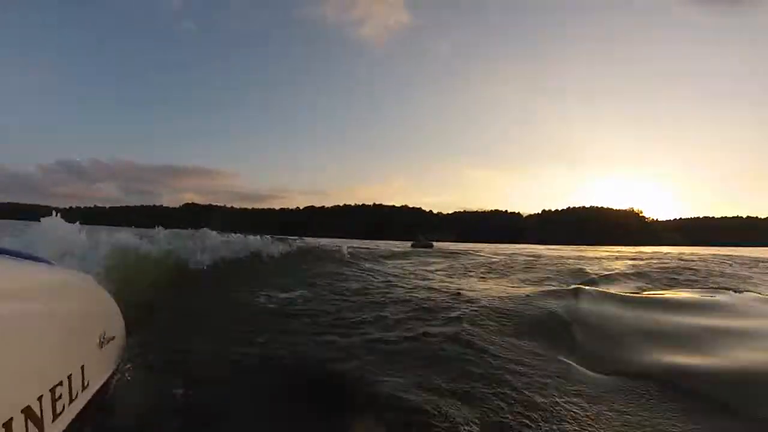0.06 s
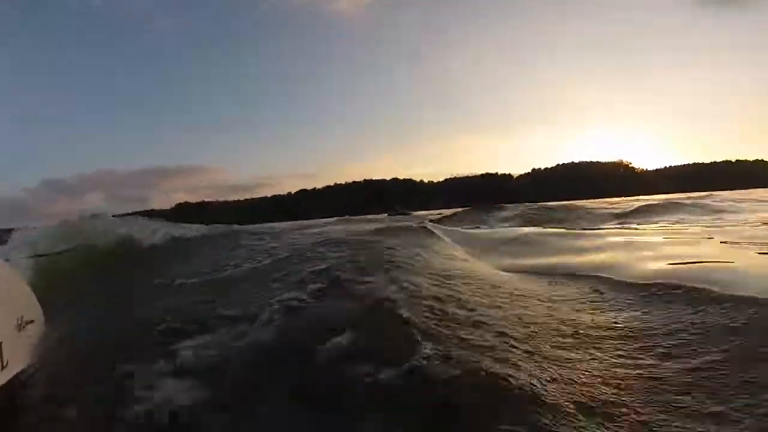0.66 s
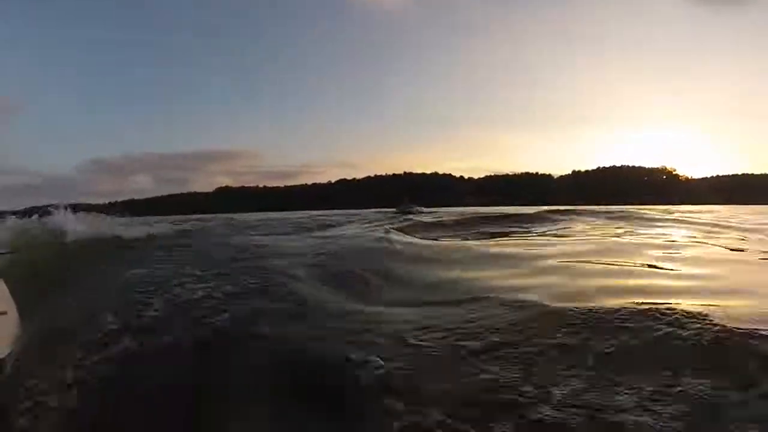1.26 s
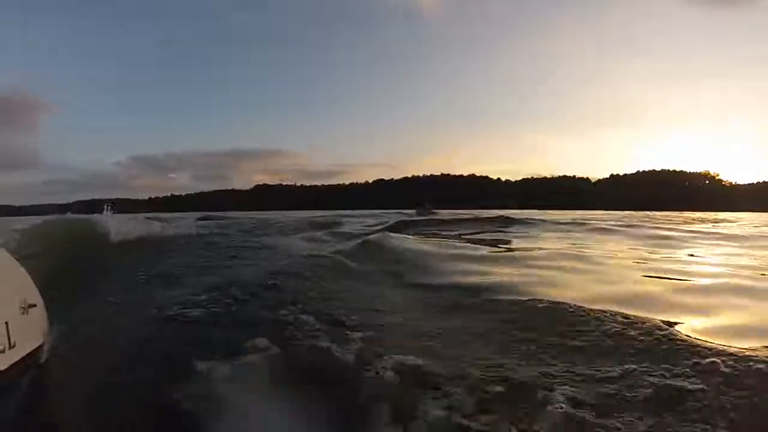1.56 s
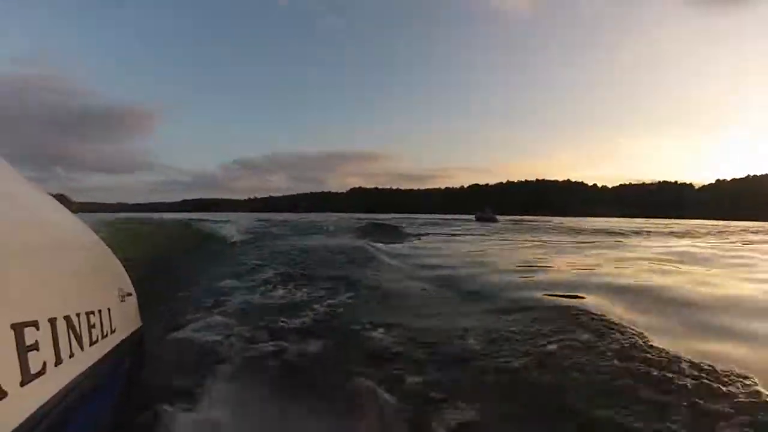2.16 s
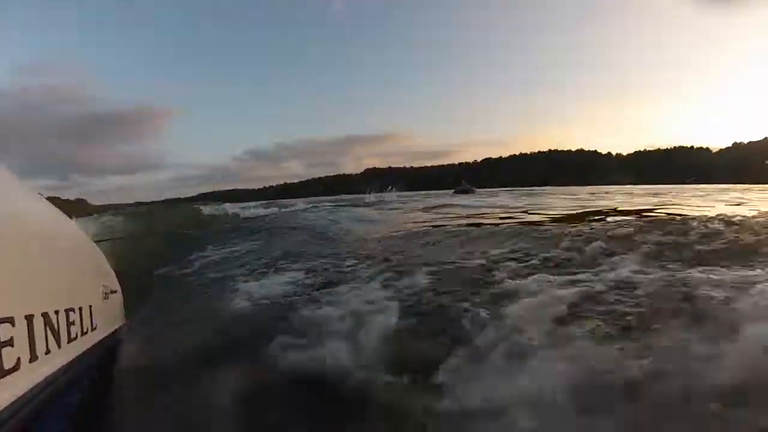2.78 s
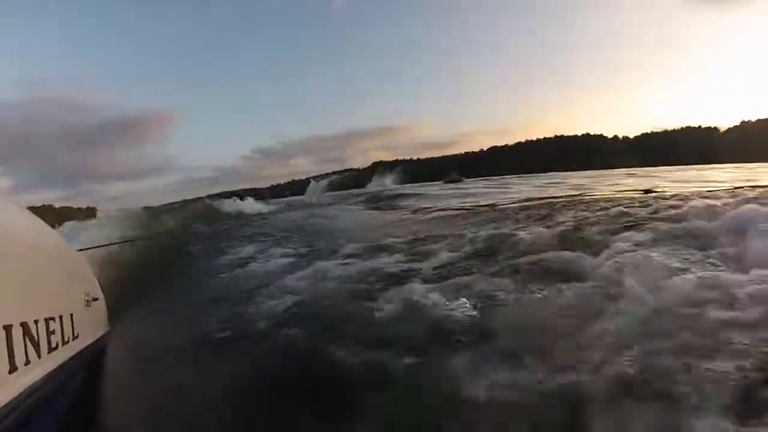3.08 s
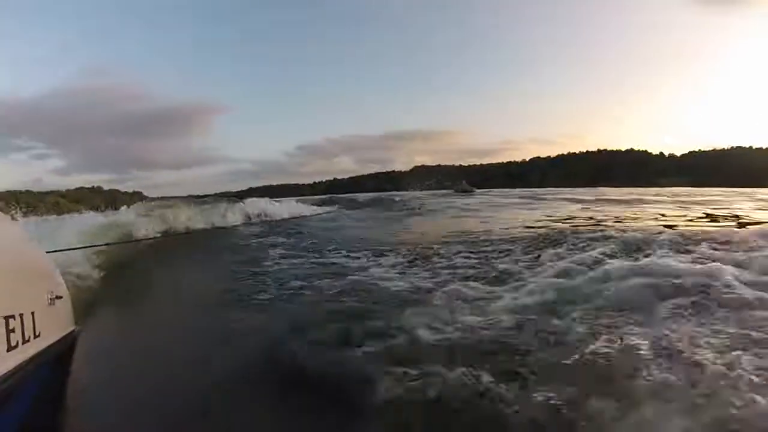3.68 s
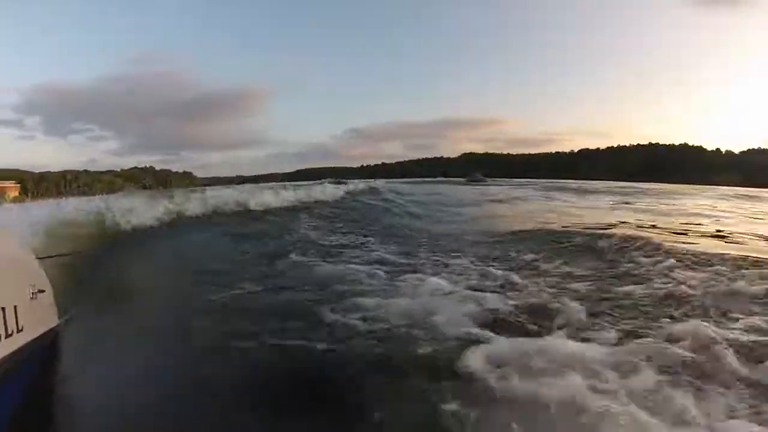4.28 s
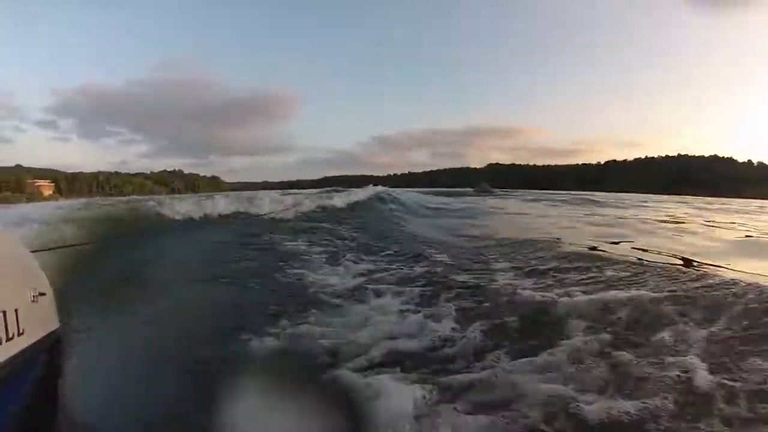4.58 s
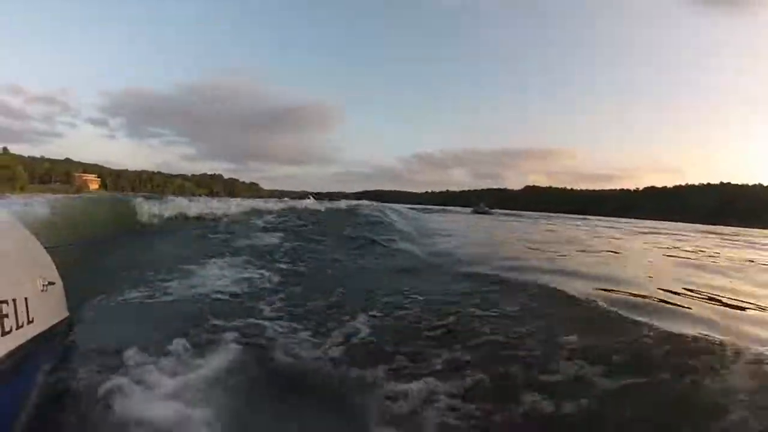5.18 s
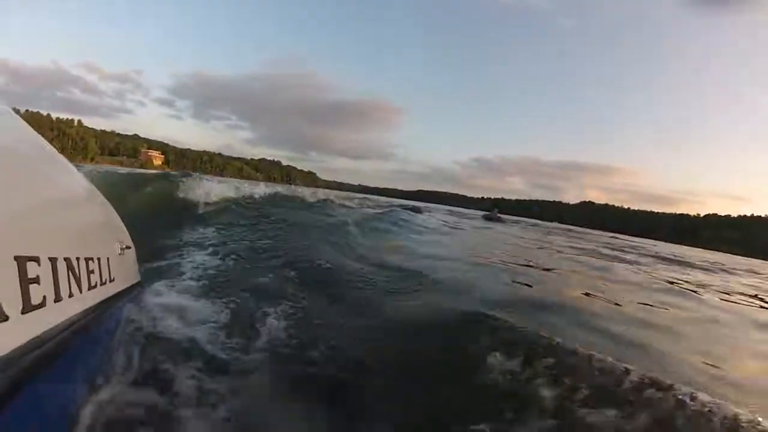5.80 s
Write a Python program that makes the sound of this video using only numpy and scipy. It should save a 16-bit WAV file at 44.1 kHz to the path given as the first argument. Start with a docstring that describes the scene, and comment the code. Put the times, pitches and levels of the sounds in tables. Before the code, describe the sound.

A motorboat cruises over a lake at a steady speed, heard from low beside the stern. Its exhaust throbs unevenly under rushing, gurgling water, and drops slap close to the microphone. After about two seconds the engine grows into a louder hum with a deep hull rumble, while waves break into hissing spray and more drops slap. Near the end the exhaust throbs again.

```python
"""A six-cylinder motorboat cruises over a lake, heard from a camera held low beside the stern.
At first the exhaust throbs as waves cover and uncover it; water rushes by and drops slap close up.
After two seconds the engine shakes the hull harder, and the exhaust settles into a louder hum.
Waves break into spray and more drops slap, all coloured by the ringing of the camera's case.
In the last second the exhaust throbs again."""
import sys
import numpy as np
from scipy import signal
from scipy.fft import rfft, irfft
from scipy.io import wavfile
from scipy.ndimage import uniform_filter1d

SR = 44100
rng = np.random.default_rng(int(sys.argv[2]) if len(sys.argv) > 2 else 0)


def generate_wav(sig):
    """Save sig (samples, or channels by samples) to the path in sys.argv[1] as 16-bit PCM at SR."""
    pcm = np.round(np.clip(np.atleast_2d(sig).T, -1, 1) * 32767).astype(np.int16)
    wavfile.write(sys.argv[1], SR, pcm)


N = 261954

# pitches that the camera's case boosts or dulls: pitch_hz, width_hz, gain_db
CASE_RINGING = [(1800, 100, -3), (2164, 280, 7.5), (2428, 170, -6), (2570, 140, 4), (3630, 190, -5.5),
                (4054, 130, 2.5), (5260, 270, -2.5), (5430, 1400, 5), (7090, 330, 3.5), (8450, 270, -0.5)]


def exhaust(turns):
    """Cylinders fire three times a turn; being unequal, they also drone, chug and growl. Gas burbles out."""
    # the hum between throbs: time_s, firing_db, octave_db, drone_db, growl_db
    hum_levels = [(0, -56, -59, -59, -65.5), (.7, -47, -59, -56.5, -65.5), (2.22, -46.5, -56.5, -58, -71),
                  (2.35, -42, -54, -51, -59), (2.5, -33, -48, -52.5, -56), (2.9, -37.5, -42, -48.5, -61),
                  (3.3, -36.5, -50, -54.5, -63.5), (3.75, -34.5, -53, -56, -61),
                  (4.2, -35.5, -58, -48, -65), (4.75, -34.5, -50.5, -50, -66.5),
                  (4.98, -39.5, -57.5, -54, -77), (5.94, -40.5, -63, -51, -62)]
    # a wave uncovers the outlet: middle_s, length_s, firing_db, octave_db
    throbs = [(.01, 0.041, -48, -43), (.13, .09, -40.5, -42), (.36, 0.062, -40, -39),
              (.56, 0.039, -37.5, -47), (.88, 0.1, -37, -56), (1.13, 0.064, -35, -50.5),
              (1.36, 0.098, -40.5, -57), (1.6, 0.13, -34.5, -46.5), (1.78, 0.081, -34, -51),
              (1.98, 0.056, -39.5, -45), (2.11, 0.082, -34.5, -49), (2.36, 0.07, -34, -48.5),
              (2.48, 0.056, -41, -55), (3.09, 0.083, -41, -34), (3.22, 0.066, -40, -39),
              (3.74, 0.13, -44.5, -49), (4.87, .06, -40.5, -54.5), (5.06, 0.093, -39.5, -47.5),
              (5.26, 0.11, -37.5, -47), (5.43, 0.096, -41, -49), (5.59, 0.084, -37.5, -59),
              (5.82, 0.067, -38, -51.5)]
    # low tones of the unequal cylinders: beats_per_cycle, relative_db
    chug_tones = [(7, -27), (10, -1.5), (11, -0.5), (13, 0), (14, 0.5), (15, -2)]
    # their higher tones: beats_per_cycle, relative_db
    growl_tones = [(16, -2), (18, -3), (19, -0.5), (20, -11), (24, 0), (30, -7.5), (34, -14), (42, -11.5)]
    # gas bubbling through water: pitch_hz, relative_db
    burble_shape = [(20, -20), (60, -1.5), (95, 2), (135, 6.5), (190, -15.5), (255, -2), (320, -22),
                    (420, -18), (700, -35)]
    steady_db, steady_octave_db, drone_db, growl_db = curves(hum_levels)
    throb, throb_octave = swells(throbs)
    firing_gain = undb(steady_db) + throb
    octave_gain = undb(steady_octave_db) + throb_octave
    firings, cycles = 3 * turns, turns / 2  # one engine cycle takes two turns
    hum = firing_gain * tone(firings, 1, rough=0.16) + octave_gain * tone(firings, 2, rough=0.28)
    # each row of cylinders makes half the firings and drones at three times that rate
    drone = undb(drone_db) * tone(firings / 2, 3, rough=0.39)
    chug = sum(undb(db) * tone(cycles, beats, rough=0.45) for beats, db in chug_tones)
    growl = sum(undb(db) * tone(cycles, beats, rough=0.45) for beats, db in growl_tones)
    burble = unit(colour(rng.standard_normal(N), burble_shape))
    # chug and burble swell as the outlet clears the water, but less than the hum does
    clear_db = 10 * np.log10(firing_gain * octave_gain) + 45
    chug_gain = undb(-61.5 + 0.59 * clear_db)
    burble_gain = undb(-49 + 0.32 * clear_db)
    return hum + drone + undb(growl_db) * growl + chug_gain * chug + burble_gain * burble


def hull(turns):
    """The engine shakes the hull once and twice a turn, with a wobble at half and one and a half times a turn,
    and a low rumble."""
    # strength of the shaking: time_s, once_a_turn_db, twice_a_turn_db
    shake_levels = [(0, -48, -46), (.5, -56, -48.5), (1.75, -56, -56), (2.1, -40.5, -48), (2.6, -34, -38.5),
                    (2.9, -38.5, -35.5), (3.15, -34.5, -36.5), (3.45, -36.5, -30), (3.9, -36.5, -30),
                    (4.7, -33, -35.5), (5.25, -35, -44), (5.94, -35, -50)]
    once_gain, twice_gain = undb(curves(shake_levels))
    rumble_shape = [(12, 13), (24, 6), (45, -5), (63, 9.5), (80, -11.5)]  # pitch_hz, relative_db
    rumble = unit(colour(rng.standard_normal(N), rumble_shape))
    cycles = turns / 2
    wobble = undb(-15) * tone(cycles, 1, rough=0.55) + undb(-13) * tone(cycles, 3, rough=0.4)
    once = undb(0.83 * wander(9) + 0.5) * tone(turns, 1, rough=0.21)
    twice = tone(turns, 2, rough=0.05)
    rumble_gain = np.hypot(undb(-8.5) * once_gain, undb(-47.5))  # part follows the shaking, part is steady
    return once_gain * (once + wobble) + twice_gain * twice + rumble_gain * rumble


def slaps(burst_s=0.0019, fizz_s=0.0048):
    """Each slap is an air pocket collapsing inside a softer, higher fizz of droplets; both ring the case."""
    # water slapping close by: time_s, relative_db, pitch_hz, spread_octaves
    hits = [(.325, -41.5, 2900, 0.8), (.365, -40, 2000, 0.51), (.388, -38, 2960, 0.48),
            (.431, -40, 2100, .7), (.456, -47, 5100, 0.86), (0.5058, -36, 2270, 0.69),
            (.556, -33.5, 2060, .5), (.62, -44.5, 4000, .4), (.672, -32.5, 1860, 0.65),
            (.726, -39.5, 2600, .3), (0.76, -34.5, 1900, .5), (.794, -41, 5470, .45),
            (2.102, -42.5, 3500, 0.46), (2.205, -47, 6500, 0.18), (2.302, -42.5, 5630, 0.53),
            (2.326, -45, 3900, 0.76), (2.38, -32, 2500, 0.83), (2.502, -42, 5200, 0.77),
            (2.551, -39.5, 2840, 0.52), (2.649, -35.5, 2100, 0.55), (2.675, -37, 2200, 0.16),
            (2.965, -35, 3040, 0.26), (3.027, -37, 2400, .5), (3.266, -45, 3900, 1.1),
            (3.373, -36, 2530, 0.36), (3.396, -31, 2060, 0.37), (3.457, -35, 2650, 0.43),
            (3.498, -27, 2460, 0.28), (3.53, -39, 4150, .4), (3.601, -38, 3700, 0.16),
            (3.651, -40, 3900, .3), (4.069, -38, 2300, 0.54), (4.229, -36.5, 5200, .4),
            (4.252, -38.5, 5000, 0.5), (4.267, -38, 4200, 0.77), (4.327, -40, 4270, 0.33),
            (4.353, -39, 4440, .4)]
    # the two parts of a slap: pitch_hz, relative_db
    pocket_shape = [(600, -6.5), (1200, 1.5), (1550, 11.5), (1830, -5.5), (2200, 1.0), (3500, -2.5),
                    (5600, -4), (15000, -16.5)]
    fizz_shape = [(1000, 2), (5600, -6), (12000, -3)]
    out = np.zeros(N + SR)
    size = 2048
    t = (np.arange(size) - size // 2) / SR  # zero at the peak of the slap
    for time_s, db, hz, octaves in hits:
        pocket, fizz = rng.standard_normal((2, size))
        pocket = colour(band(pocket, hz, octaves), pocket_shape, CASE_RINGING)
        pocket *= np.exp(-(t / burst_s) ** 2 / 2)
        pocket /= np.std(pocket[np.abs(t) < .002])
        fizz = unit(colour(band(fizz, 1.1 * hz, 1.45 * octaves), fizz_shape, CASE_RINGING))
        fizz *= np.exp(-np.abs(t) / fizz_s)
        start = int((time_s + 0.001315) * SR) - size // 2
        out[start:start + size] += undb(db - 2) * (pocket + undb(-10) * fizz)
    return out[:N]


def wake(churn_db=-57, foam_db=-69.5):
    """The boat stirs up the lake; breaking waves add to the churn, rush and spray, over steady foam."""
    # the passing water: time_s, rush_db, spray_db
    water_levels = [(0, -50, -53.5), (.7, -47, -53), (1.5, -52, -55.5), (1.9, -53, -54.5),
                    (2.4, -49.5, -51), (2.75, -54, -49.5), (3.05, -51, -51.5), (3.45, -48, -49.5),
                    (3.95, -48, -50.5), (4.38, -46, -50.5), (4.75, -51, -52), (5.05, -51, -51.5),
                    (5.3, -53.5, -53.5), (5.94, -53.5, -52)]
    # waves breaking beside the hull: middle_s, length_s, churn_db, rush_db, spray_db
    breaking_waves = [(.88, 0.14, -58, -61, -61), (2.66, 0.096, -62, -46, -53.5),
                      (2.82, 0.15, -63, -48.5, -51), (3.67, 0.15, -61, -55, -51),
                      (3.77, .07, -60, -45.5, -59), (3.8, 1., -56, -60, -56), (5.66, 0.41, -58, -51.5, -74)]
    rush_db, spray_db = curves(water_levels)
    flow_gains = undb([np.full(N, churn_db), rush_db, spray_db])
    churn_gain, rush_gain, spray_gain = np.hypot(flow_gains, swells(breaking_waves))
    return churn_gain * churn() + rush_gain * rush() + spray(spray_gain) + undb(foam_db) * foam()


def rush():
    """Water gurgles along the hull and rings the case."""
    # rushing water: pitch_hz, relative_db
    rush_shape = [(700, -27), (1150, -10.5), (1380, -3), (1500, 4), (1590, 2.5), (1720, -4), (1830, -28.5),
                  (2000, -13.5), (2210, -17), (2340, -15), (3000, -33.5), (8000, -27), (15000, -49.5)]
    gurgle = rng.standard_normal(N) * undb(2.4 * wander(45) + .5 * wander(7.8))
    return unit(colour(gurgle + 0.61 * patter(300, 2.6), rush_shape, CASE_RINGING), (1300, 1800))


def spray(gain):
    """Fine hiss and bursting drops; the harder the wake breaks, the more single drops stand out."""
    # large, middling and fine drops, each in flurries of their own: pitch_hz, relative_db
    drop_kinds = [(2200, 0), (4600, -1.5), (9500, 2)]
    # flying spray: pitch_hz, relative_db
    spray_shape = [(600, -32), (1300, -7), (1830, 2), (2150, 4.5), (2400, 5), (2700, 1.5), (3700, 0.5),
                   (4800, -4.5), (5600, -5.5), (6200, -11.5), (7700, -9), (8800, -16), (12000, -18),
                   (15000, -27.5)]
    drops = np.zeros(N)
    for hz, db in drop_kinds:
        flurries = patter(1000, 4.1) * undb(4.95 * np.tanh(wander(60)))
        drops += undb(db) * band(flurries, hz, 0.57)
    breaking = (gain / gain.max()) ** 0.32
    splash = colour(rng.standard_normal(N) + 1.35 * breaking * drops, spray_shape, CASE_RINGING)
    return undb(-0.48) * gain * unit(splash, (2400, 9000))


def churn():
    """Water tumbles behind the stern with a dull roar."""
    # churning water: pitch_hz, relative_db
    churn_shape = [(150, -23.5), (300, 1), (450, 2), (650, -1), (950, -2), (1250, -1), (1800, -19),
                   (3000, -39.5)]
    tumbling = rng.standard_normal(N) + .4 * patter(500, 3)
    return unit(colour(tumbling, churn_shape, CASE_RINGING), (500, 1150))


def foam():
    """Foam fizzes, with a sparkle of single bubbles."""
    sparkle = .6 * patter(120, 4, largest=3)
    return unit(band(rng.standard_normal(N) + sparkle, hz=9800, octaves=0.44))


def whine():
    """Faint, thin tones far up in the treble."""
    # the whining tones: pitch_hz, level_db
    high_tones = [(10428, -87), (10491, -85), (13965, -90)]
    return sum(undb(db) * tone(np.arange(N) / SR, hz, rough=0.27) for hz, db in high_tones)


def undb(db):
    """Turn decibels into a number to multiply by."""
    return 10 ** (np.asarray(db) / 20)


def curves(table):
    """Join each column of a table with straight lines over time."""
    times, *columns = np.transpose(table)
    return [np.interp(np.arange(N) / SR, times, column) for column in columns]


def swells(table):
    """Smooth rises and falls, length_s wide at half height; one gain curve for each level column."""
    t = np.arange(N) / SR
    return sum(undb(levels)[:, None] * .5 ** ((2 * (t - middle_s) / length_s) ** 2)
               for middle_s, length_s, *levels in table)


def wander(rate_hz):
    """A smooth random drift, mostly between -1 and 1."""
    hold = max(int(SR / rate_hz), 1)
    steps = np.repeat(rng.standard_normal(4096)[:N // hold + 1], hold)
    return 1.17 * uniform_filter1d(uniform_filter1d(steps, hold), hold)[:N]


def tone(turns, multiple, rough):
    """A tone that swings `multiple` times a turn; `rough` makes its strength and timing waver."""
    angle = 2 * np.pi * (multiple * turns + rng.random())
    return np.sqrt(2) * ((1 + rough * wander(30)) * np.sin(angle) + rough * wander(30) * np.cos(angle))


def patter(per_second, spread_db, largest=2.05):
    """Tiny random taps: many small, a few large."""
    taps = rng.random(N) < per_second / SR
    size = np.minimum(rng.exponential(size=N), largest)
    return unit(taps * rng.choice([-1, 1], N) * undb(spread_db * size))


def colour(x, shape, ringing=()):
    """Filter a sound to a shape of (pitch_hz, relative_db) points, plus any ringing peaks and dips."""
    size = 16384
    f = np.maximum(np.fft.rfftfreq(size, 1 / SR), 1)
    hz, db = np.transpose(shape)
    beyond_ends = np.maximum(f / hz[-1], 1) * np.maximum(hz[0] / f, 1)
    shape_db = np.interp(np.log(f), np.log(hz), db) - 40 * np.log10(beyond_ends)
    for pitch_hz, width_hz, gain_db in ringing:
        shape_db += gain_db / (1 + (2 * (f - pitch_hz) / width_hz) ** 2)
    # build the filter so that it rings only after a sound, never before
    cepstrum = irfft(np.log(undb(shape_db)))
    response = irfft(np.exp(rfft(2 * cepstrum[:size // 2], size) - cepstrum[0]))
    return signal.fftconvolve(x, response)[:len(x)]


def band(x, hz, octaves):
    """Keep the part of a sound near one pitch, fading away on both sides."""
    f = np.maximum(np.fft.rfftfreq(len(x), 1 / SR), 1)
    away = np.log2(f / hz) / octaves
    return irfft(rfft(x) * np.exp(-away ** 2 / 4), len(x))


def unit(x, range_hz=(0, SR)):
    """Scale a sound so that its average strength (rms) within a pitch range is 1."""
    f = np.fft.rfftfreq(len(x), 1 / SR)
    return x / np.std(irfft(rfft(x) * ((f >= range_hz[0]) & (f < range_hz[1]))))


def scene():
    """The turning engine drives hull and exhaust; water and a faint whine play over them."""
    # speed of the engine's shaft: time_s, turns_per_s
    engine_speed = [(0, 37.45), (2, 37.38), (2.6, 37.5), (3.9, 37.47), (4.6, 37.2), (5.94, 37.15)]
    speed, = curves(engine_speed)
    turns = np.cumsum(speed * (1 + 0.0032 * wander(5))) / SR
    return (hull(turns) + exhaust(turns) + wake() + slaps() + whine())[None]


def record(dry, top_hz=15300):
    """The camera cuts off the highest treble."""
    return signal.sosfilt(signal.ellip(10, .2, 80, top_hz, fs=SR, output="sos"), dry)


dry = scene()
out = record(dry)
generate_wav(out)
```